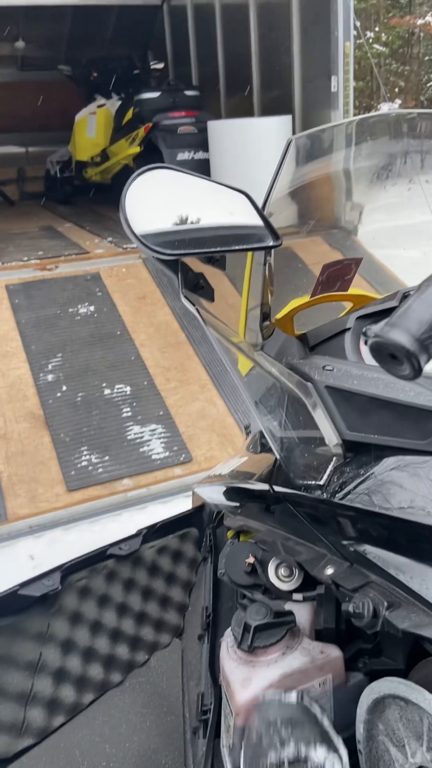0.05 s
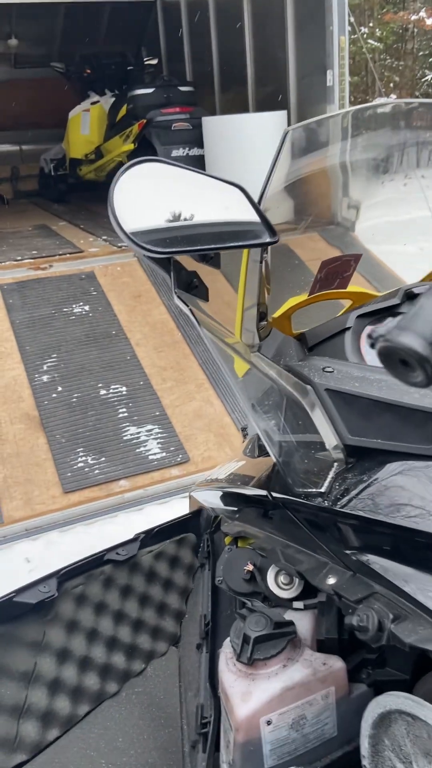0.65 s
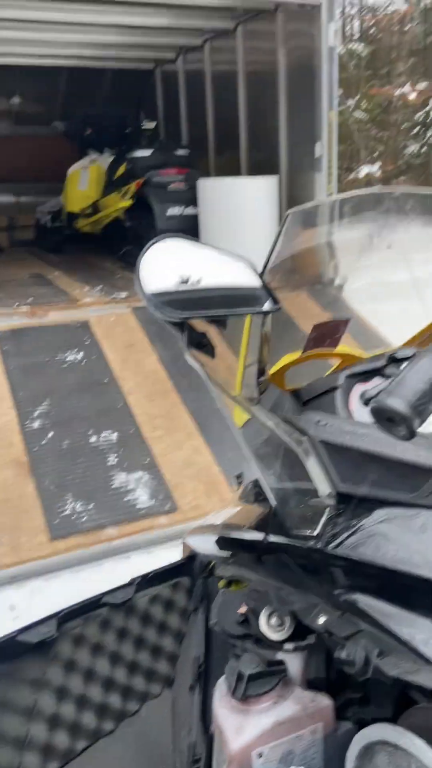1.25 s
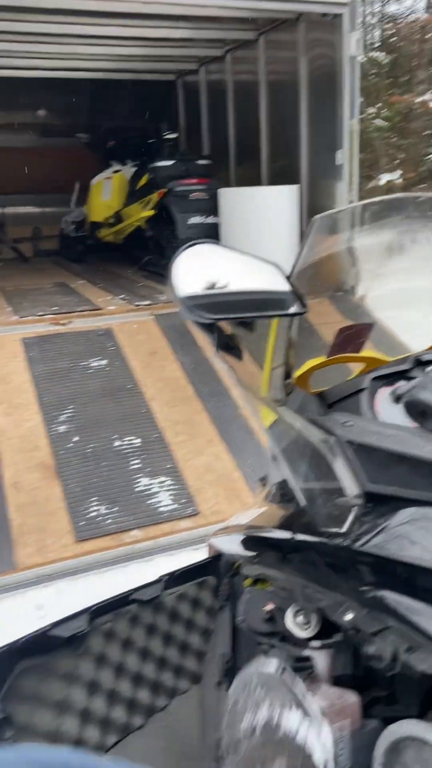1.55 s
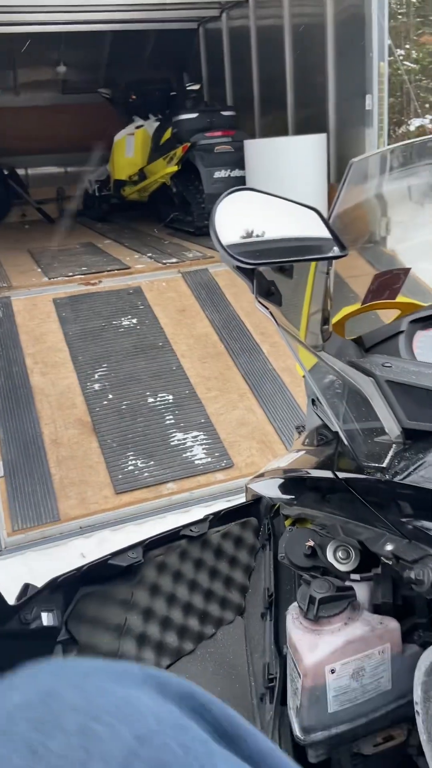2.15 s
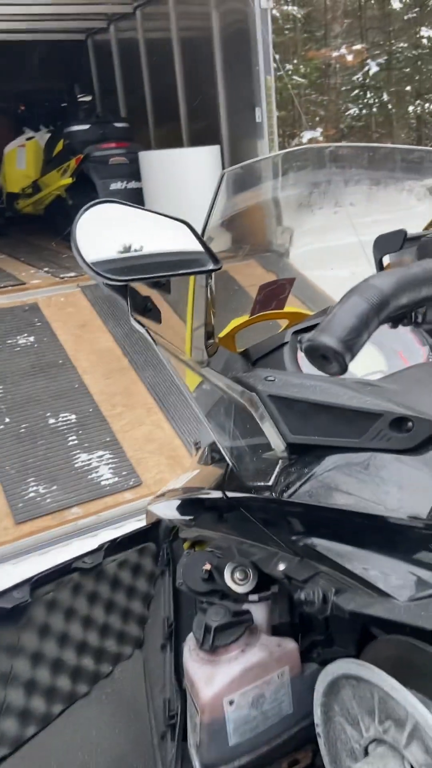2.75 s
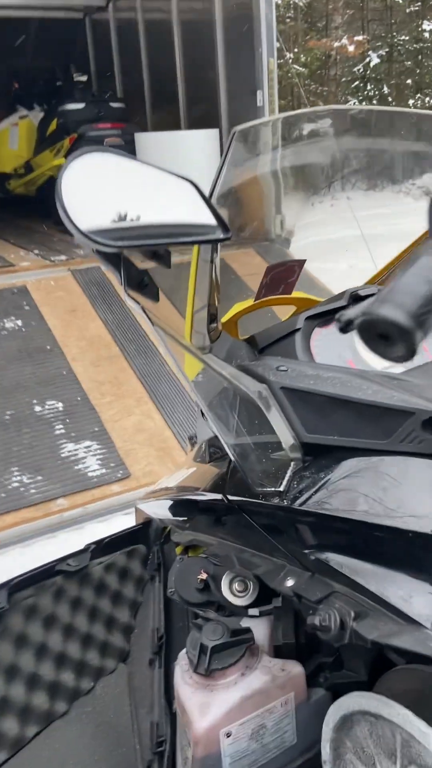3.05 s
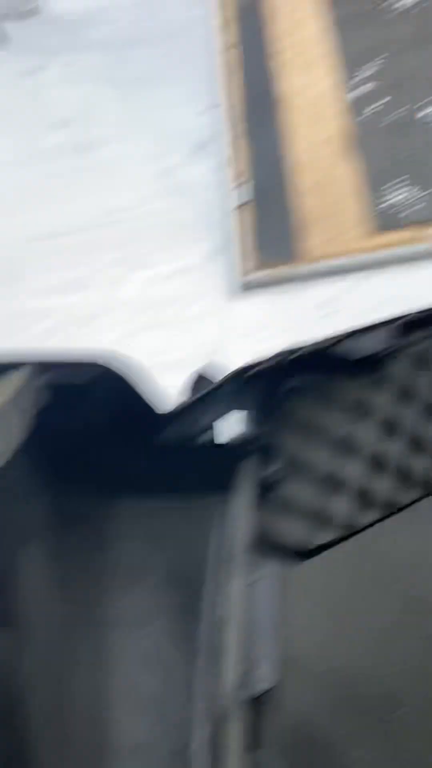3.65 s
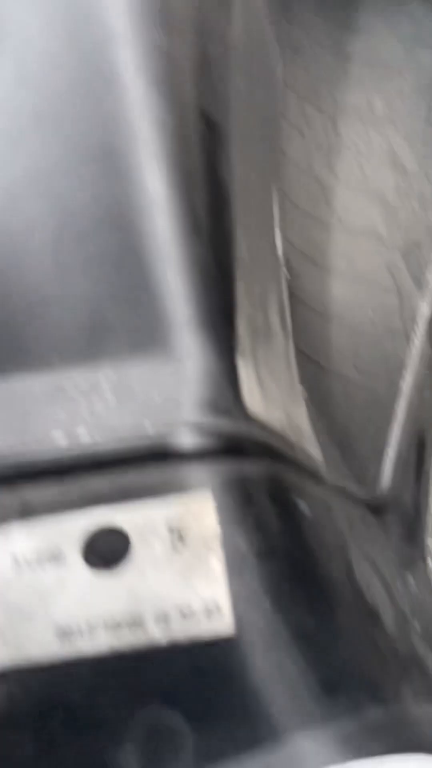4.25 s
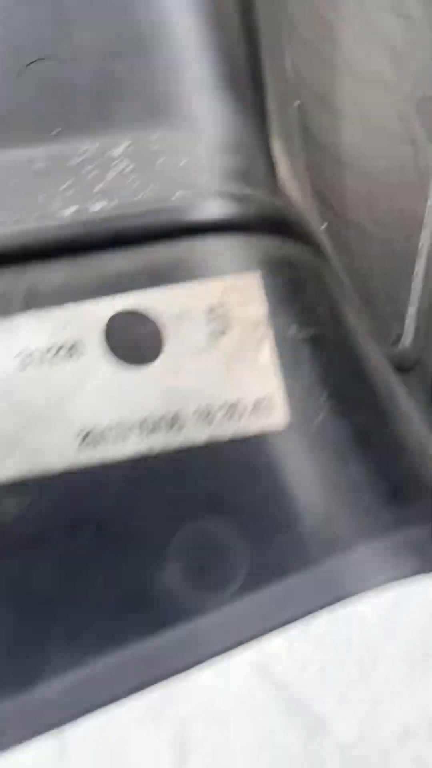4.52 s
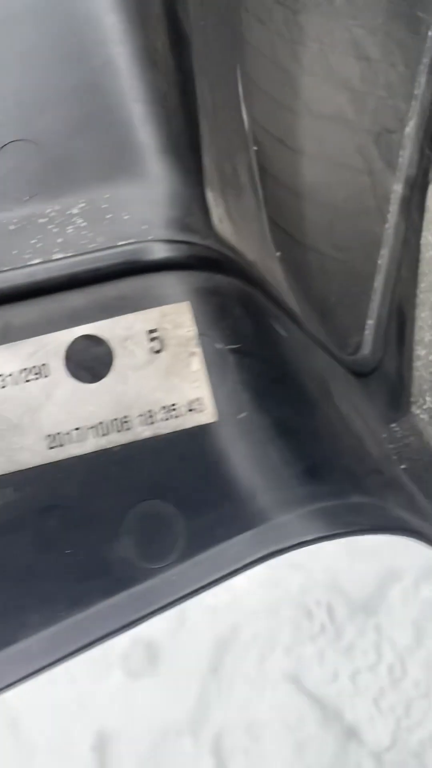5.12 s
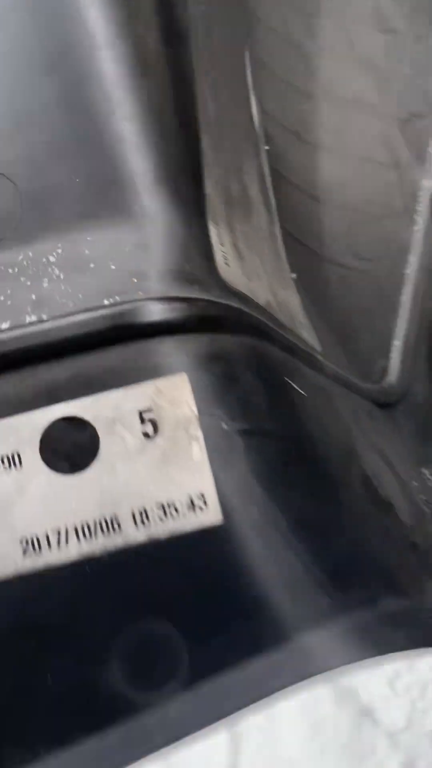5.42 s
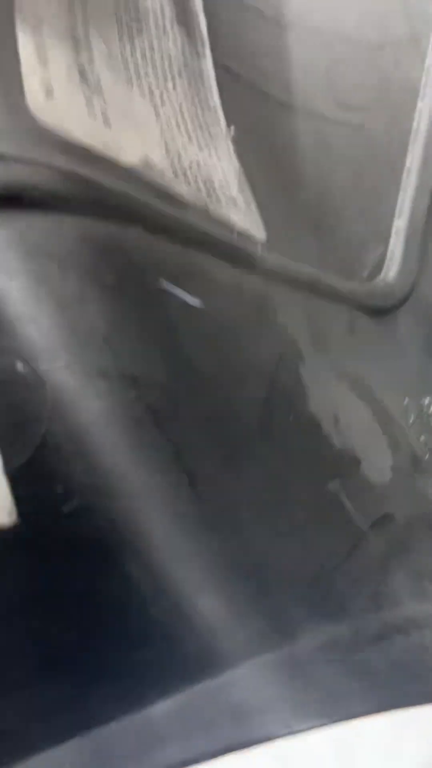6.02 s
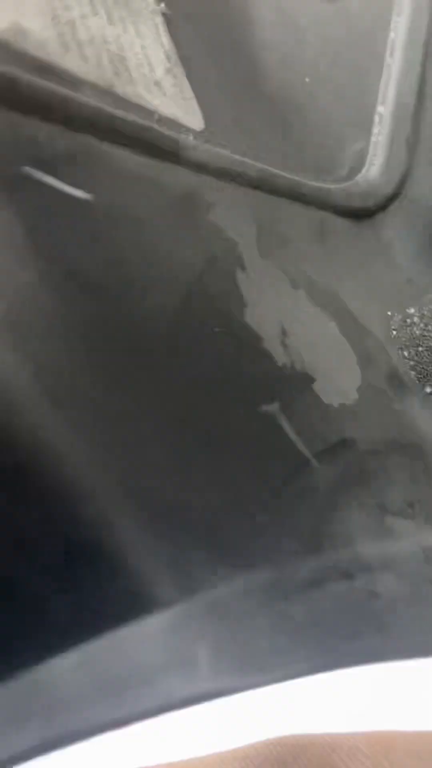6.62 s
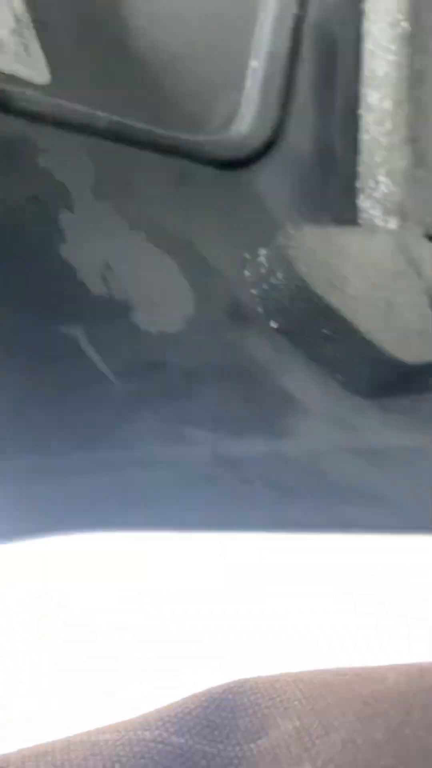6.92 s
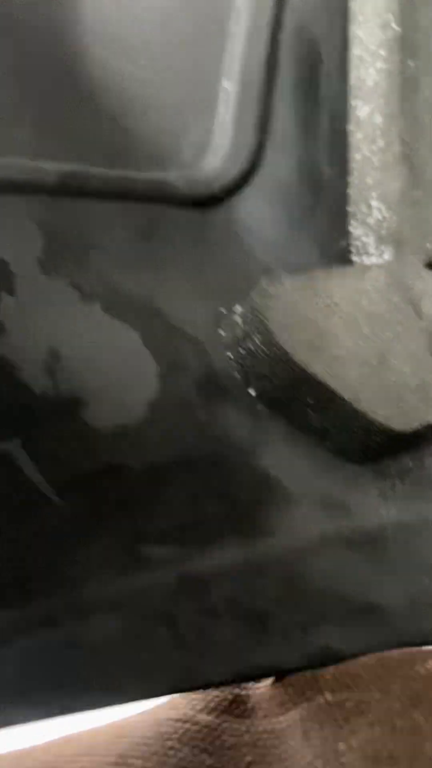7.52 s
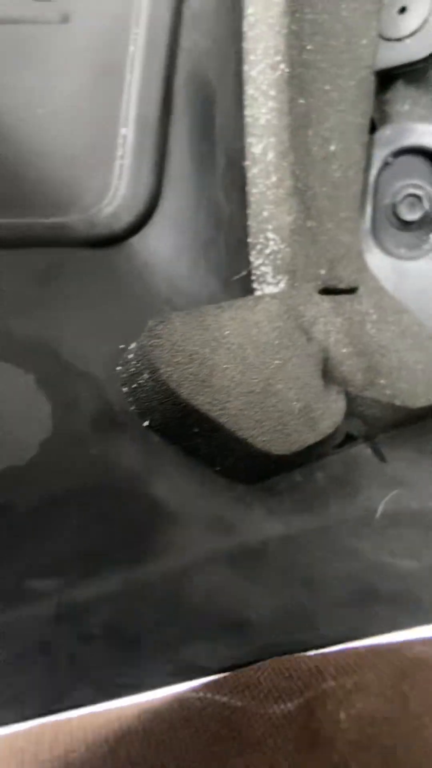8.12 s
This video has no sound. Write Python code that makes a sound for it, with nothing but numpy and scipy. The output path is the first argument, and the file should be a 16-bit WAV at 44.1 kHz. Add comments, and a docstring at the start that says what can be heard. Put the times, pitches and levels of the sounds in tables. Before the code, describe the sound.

A distant machine's low, steady hum runs throughout, swelling slightly later, under close, faint cloth rustle and a few soft finger bumps. At 0.8 seconds a hard part snaps against a snowmobile's plastic bodywork, with a bright crack, a hollow ring and a faint short echo from an open trailer. From 2.4 to 3.2 seconds comes a cluster of lighter clicks and clacks. Air stirs softly at the microphone around 3.5 seconds. From 4 to 4.8 seconds sleeves swish and zip and a glove scrapes the plastic, with a thin squeak, more snaps and a dull bump. Further snaps fall between 5.7 and 7.1 seconds. From 6 to 7.5 seconds fingers thump and rub the microphone's case, the loudest stretch, with gritty crunches and low rumble. A small creak and swish follow near 7.8 seconds, and another bump at 8.2.

```python
"""Shifting about on a parked snowmobile

Someone beside an open trailer holds a camera close to a snowmobile's plastic panels. Hard parts
snap against the bodywork and make it ring. Fingers bump and rub the camera's case, sleeves swish
and a glove scrapes the plastic. Underneath lie softly stirred air and a distant machine's low hum."""
import sys
import numpy as np
from scipy import signal
from scipy.fft import rfft, irfft, next_fast_len
from scipy.io import wavfile
from scipy.ndimage import uniform_filter1d, map_coordinates

SR = 44100
rng = np.random.default_rng(int(sys.argv[2]) if len(sys.argv) > 2 else 0)


def inscribe(sig):
    """Save sig as 16-bit PCM at rate SR to the path in sys.argv[1].

    A 1-D sig is mono; a 2-D sig holds one channel per row.
    Samples are clipped to [-1, 1] before scaling.
    """
    pcm = np.round(np.clip(np.atleast_2d(sig).T, -1, 1) * 32767)
    wavfile.write(sys.argv[1], SR, pcm.astype(np.int16))


N = 364707
COARSE_TIMES_S = np.arange(0, N / SR, .002)  # enough for slow changes in loudness

# soft finger bumps on the camera's case: start_s, level_db, pitch_hz, fade_s, scuff_over_ring_db
FINGER_BUMPS = [(0.167, -20, 308, 0.0066, -11), (0.213, -28, 156, 0.013, -3.5),
                (1.292, -28, 223, 0.0082, -9), (1.352, -25.5, 157, 0.011, -15),
                (1.435, -38.5, 280, 0.007, -4.5), (3.232, -25.5, 151, 0.008, -21),
                (4.653, -10, 152, 0.016, -9), (4.698, -19.5, 144, 0.0072, -9.5),
                (5.391, -22, 175.5, 0.014, -5.5), (6.056, -10, 298, 0.0051, -7),
                (6.08, -6, 311, 0.0095, -14), (6.093, -8.5, 295, 0.0072, -25),
                (6.1366, -2, 297, 0.0075, -12.5), (6.162, -19, 214, 0.023, -8),
                (6.182, -15.5, 125, 0.011, -9.5), (6.333, -18.5, 314, 0.0072, -17),
                (6.582, -13, 126, 0.011, -9.5), (6.64, -11.5, 201.6, 0.018, -3.5),
                (6.892, -5, 138, 0.007, -8.5), (7.016, -3, 146, 0.0086, -11),
                (7.044, -8, 198, 0.0063, -4.5), (7.057, -11, 120, 0.015, -8.5),
                (7.164, -18.5, 105, 0.012, -12), (7.394, -19, 339, 0.0086, -2.5),
                (7.421, -13, 177, 0.012, -8.5), (7.438, -15.5, 193, 0.01, -24),
                (7.481, -16.5, 303, 0.0072, -24), (7.509, -17.5, 323, 0.0084, -33),
                (7.729, -22.5, 262, 0.0098, -11), (7.768, -25, 235, 0.017, -9),
                (7.91, -23.5, 98.4, 0.036, -12.5), (8.238, -12, 301, 0.0075, -13.5),
                (8.25, -16.5, 205, 0.0099, -32)]
# steady shifting about: time_s, cloth_slide_db, grip_db
BODY_MOVEMENT = [(0.0, -62, -60), (0.33, -71, -56), (0.71, -63, -54), (1.04, -69, -55.5),
                 (1.469, -64.5, -49.5), (1.77, -56, -55), (2.16, -64, -55), (2.51, -55.5, -45),
                 (2.67, -59.5, -52.5), (2.85, -54.5, -55), (3.04, -52, -44.5), (3.55, -51.5, -43),
                 (3.88, -60.5, -49.5), (3.98, -49, -50), (4.12, -50, -57), (4.33, -51.5, -43),
                 (4.7, -53, -52), (4.86, -54, -39), (5.0, -56, -52.5), (5.24, -55.5, -49),
                 (5.3, -57.5, -49), (5.4, -54.5, -46), (5.71, -52, -49), (6.36, -56.5, -40.5),
                 (6.76, -51, -45), (6.91, -58.5, -59), (7.02, -59.5, -26.5), (7.16, -56, -49.5),
                 (7.45, -61, -35), (7.58, -56.5, -46), (7.7, -49, -39.5), (8.1, -59.5, -49),
                 (8.27, -56, -48.5)]
# the camera is lowered: time_s, position (0 above the panel, 1 beside it)
CAMERA_POSITION = [(3.97, 0.06), (4.3, 1)]


def snaps():
    """A hard part hits the bodywork: a bright crack and stiff ring, then the panel's clack and boom."""
    # start_s, strength_db, then relative to that: flex_db (panel bending), latch_db, edge_db, sheen_db
    hits = [(0.8055, -27, -1, -7.5, -5.5, -0.5), (2.3768, -41, -6.5, -9, -5, 0.5),
            (2.4295, -39.5, -18, -10, -4, 1), (2.4546, -31, 0, -2.5, -3.5, 4.5),
            (2.555, -34, -1, -4, -2.5, 4.5), (2.7104, -43, -7.5, -3, -1.5, 7.5),
            (2.7304, -49, -6.5, -15, -3, 5), (2.864, -33, -1, -1.5, -3, 3),
            (2.895, -57.5, 9, -13, -14, -12), (2.9548, -40, -3, -4, -6, -0.5), (2.968, -46, 3, -2, -4, -2),
            (2.978, -44, -2, -4, -7, -13), (3.1821, -46.5, -4, -1, -7, 0.5), (3.191, -49, -3, 0, -7, 4),
            (3.9696, -35.5, -1, 1, -4.5, -5.5), (4.215, -49, 8.5, -1, -6, -8),
            (4.2529, -41, -5, 4.5, -1, 5), (4.4629, -36.5, 0.5, 1.5, -3, -5),
            (4.4841, -36, -3, 0.5, -2, -1), (4.7306, -41.5, -1, -5, -4, 1.5), (4.7557, -42, -3, -3, -2, 3),
            (4.787, -36.5, -4, -1, -0.5, 4), (5.041, -49.5, -9, -7, -8, -5),
            (5.7034, -38.5, 0.5, 0.5, -4.5, -2), (5.7213, -36.5, -1.5, 2.5, -3.5, 2.5),
            (5.883, -35.5, -1.5, 1.5, -3.5, 3), (6.301, -37, 1, 1, -3, 4),
            (6.4298, -33, -1.5, -1, -4.5, 2.5), (6.577, -35.5, 6.5, -7, -17, -5),
            (6.5868, -29.5, -1.5, -2.5, -5.5, 1), (6.6078, -48, 17.5, 6, -12, -2),
            (6.8538, -32.5, 0, -4.5, -15, 4), (6.863, -42.5, 2, 2, -8, 3), (6.8782, -42.5, 8, -2, -10, 4),
            (6.9489, -35, -0.5, -10, -12, -0.5), (6.965, -35.5, -1.5, -11, -15, 0),
            (6.979, -42.5, 4, -4, -11, -8), (7.0579, -40.5, 0, -16, -6, 4.5),
            (7.144, -38.5, 4, -10, -17, -14)]
    # tone of the crack and of its glassy top: frequency_hz, level_db
    crack_tone = [(300, -9.5), (1200, 7), (2300, -15), (3200, 7.5), (3800, -1), (4200, 4.5), (4700, -3.5),
                  (5200, 3.5), (6200, -16.5), (8300, -26), (16000, -31.5)]
    sheen_tone = [(5000, -32), (7000, 8.5), (9000, -4), (10100, 1), (11500, 7), (13000, 7.5), (16000, -3)]
    # ringing notes of a latch and of an edge: pitch_hz, level_db, ring_s
    latch_notes = [(3140, -4.5, 0.005), (3694, -3.5, 0.014), (3870, 2, 0.016), (4080, 8, 0.0097),
                   (4220, -6.5, 0.014)]
    edge_notes = [(4650, -4.5, 0.013), (5030, 3, 0.011), (5320, -3.5, 0.011), (6900, -14.5, 0.012),
                  (9290, -12.5, 0.0057), (10720, -16, 0.013), (11430, -22, 0.026)]
    # the hits drift to the right and back: time_s, left_minus_right_db
    direction = [(0.8, 0), (4.75, -0.5), (5.7, -2), (6.43, -2), (6.85, 0)]
    crack_db, chatter_db, chatter_s = -3.5, -16, 0.0045
    out, t = np.zeros((2, N)), np.arange(SR // 7) / SR
    for start, db, flex_db, latch_db, edge_db, sheen_db in hits:
        crack = burst(crack_tone, t, wide=.28)
        sheen = amp(sheen_db) * burst(sheen_tone, t, wide=.4)
        latch = amp(latch_db) * ringing(latch_notes, t, lag_s=.0008)
        edge = amp(edge_db) * ringing(edge_notes, t, lag_s=.0008)
        panel = panel_clack(t, start, flex_db) + panel_boom(t, flex_db)
        pan_db = np.interp(start, *np.transpose(direction)) * np.array([[.5], [-.5]])
        gain = amp(db + pan_db)
        add(out, start, gain * (amp(crack_db) * crack + sheen + latch + edge + panel))
        # the part touches again at once, more softly
        add(out, start + chatter_s * rng.uniform(.5, 1.5), gain * amp(chatter_db) * (crack + sheen))
    return out


def panel_clack(t, start, flex_db):
    """The panel clacks; each spot that is hit favours the notes around one pitch."""
    # the panel's middle notes: pitch_hz, level_db, ring_s
    notes = [(945, 2, 0.031), (1014, 2.5, 0.034), (1211, 3.5, 0.034), (1490, 5.5, 0.02),
             (1660, -4.5, 0.018), (2060, -1.5, 0.026), (2334, 1, 0.02), (2460, -6.5, 0.016),
             (2580, -6, 0.023)]
    # the hits wander over the panel: time_s, favoured_pitch_hz
    spots = [(0.8, 1680), (2.4, 1470), (2.55, 1340), (2.72, 1490), (2.9, 1130), (5.9, 950), (6.3, 1080)]
    # the rough part of the clack: frequency_hz, level_db
    rasp_tone = [(500, -24), (1100, -8.5), (1500, -3.5), (1900, 0), (2400, -2.5), (2900, -14.5),
                 (4500, -13), (7000, -41.5)]
    fall_db_per_octave, rasp_db = 13.5, -7.5
    favoured_hz = np.interp(start, *np.transpose(spots))
    # beside the panel the clack is quieter, shorter and arrives sooner
    beside = np.interp(start, *np.transpose(CAMERA_POSITION))
    clack_db = 7 + 0.31 * flex_db - 7 * beside
    ring_share = np.interp(beside, [0, 1], [1, 0.86])
    lag_s = np.interp(beside, [0, 1], [0.00097, 0.0001])
    favoured = [(hz, db - fall_db_per_octave * abs(np.log2(hz / favoured_hz)), ring_s * ring_share)
                for hz, db, ring_s in notes]
    ring = ringing(favoured, t, lag_s, spread=0.14, scatter_db=2)
    return amp(clack_db) * (ring + amp(rasp_db) * burst(rasp_tone, t, wide=.3))


def panel_boom(t, flex_db):
    """The panel booms hollowly, louder and deeper where it bends more."""
    # the panel's low notes: pitch_hz, level_db, ring_s
    notes = [(153, -6, 0.13), (240, -1.5, 0.1), (364, -2.5, 0.057), (433.6, 8, 0.027), (556, 3, 0.018),
             (664, -12.5, 0.06)]
    tilt_db_per_octave = 2 - 0.062 * flex_db
    tilted = [(hz, db + tilt_db_per_octave * np.log2(hz / 350), ring_s) for hz, db, ring_s in notes]
    return amp(9 + flex_db) * ringing(tilted, t, lag_s=0.00243, spread=0.11, scatter_db=4)


def bumps():
    """A fingertip pushes the camera's case: a dull scuff of skin, a short ring and a low thud."""
    # tone of the scuff: frequency_hz, level_db
    scuff_tone = [(30, -24.5), (70, -5), (150, 7.5), (300, -0.5), (500, -7.5), (800, -17), (1500, -32),
                  (3000, -64), (6000, -61), (16000, -50)]
    press_s, scuff_lead_s, leak_hz = 0.0042, 0.00255, 16
    thud_db, thud_hz = -6.5, 84
    out, t = np.zeros((2, N)), np.arange(SR // 5) / SR
    drag = (1 - np.exp(-t / 0.00049)) * (np.exp(-t / 0.021) + amp(-10.5) * np.exp(-t / 0.025))
    for start, db, hz, fade_s, scuff_db in FINGER_BUMPS:
        press = (1 - np.exp(-(t / press_s) ** 2)) * np.exp(-t / fade_s)
        ring = lambda pitch: press / press.max() * np.sin(2 * np.pi * pitch * t)
        add(out, start - scuff_lead_s, amp(db + scuff_db) * drag * noise(scuff_tone, len(t), wide=0.42))
        add(out, start, amp(db) * (ring(hz) + amp(scuff_db + thud_db) * ring(thud_hz)))
        # the finger settles again: later, weaker, lower
        add(out, start + 0.0254, amp(db - 11.5) * ring(hz * 0.802))
    return filtered(out, lambda hz: (1j * hz / (1j * hz + leak_hz)) ** 2)  # slow pushes leak away


def rubbing_gains():
    """How strong rumble, swish and hiss are: surges add to the shifting, and bumps shake the case."""
    # brief surges of noise: peak_s, length_s, swish_db, hiss_over_swish_db
    # Most are a sleeve or hand moving. The one at 0.824 s is the first knock's fading tail,
    # and the one at 0.967 s is that knock's faint, late, hissy echo.
    noise_surges = [(0.008, 0.045, -53, -8), (0.177, 0.032, -68, 23), (0.26, 0.065, -57.5, -7.5),
                    (0.43, 0.084, -59.5, -14), (0.631, 0.2, -56.5, -6), (0.824, 0.1, -48.5, -12),
                    (0.967, 0.045, -70, -5), (1.19, 0.19, -58.5, -20), (1.298, 0.096, -50.5, -8),
                    (1.64, 0.33, -60, -2), (1.747, 0.028, -55, -23), (1.891, 0.17, -57.5, -7),
                    (2.748, 0.14, -47.5, -12.5), (3.004, 0.076, -48, -16), (3.684, 0.37, -45, -10.5),
                    (3.963, 0.13, -44.5, -13), (4.106, 0.2, -39.5, -9), (4.25, 0.073, -35.5, -9.5),
                    (4.384, 0.067, -42.5, -7.5), (4.547, 0.11, -42.5, -12), (4.628, 0.073, -37, -10),
                    (4.736, 0.11, -41.5, -10.5), (5.465, 0.041, -46.5, -15), (6.141, 0.041, -42, -17),
                    (6.186, 0.067, -47.5, -6), (6.573, 0.078, -38, -11), (6.666, 0.1, -41, -8.5),
                    (6.856, 0.17, -42, -10.5), (6.99, 0.029, -45, -14), (7.05, 0.11, -39, -5.5),
                    (7.157, 0.072, -45, -5), (7.39, 0.23, -45, -7.5), (7.662, 0.058, -53.5, 3),
                    (7.768, 0.12, -41.5, -4), (8.26, 0.057, -43, -4)]
    shudder_db, shudder_s = -21.5, 0.038
    t = COARSE_TIMES_S
    slide_db, grip_db = curves(BODY_MOVEMENT, t)
    peak, length, db, bright_db = columns(noise_surges)
    surges = amp(db) * swells(peak, length)
    hit, hit_db, *_ = columns(FINGER_BUMPS)
    shudders = amp(hit_db + shudder_db) * (t > hit) * np.exp(-np.abs(t - hit) / shudder_s)
    heaviness = amp(3 - 0.39 * bright_db)  # bright surges are light, so they rumble less
    rumble = together(amp(grip_db + 5.5), heaviness * surges, shudders)
    swish = together(amp(slide_db + 2.5), surges)
    fibre_db = -66.5 + 0.7 * (slide_db - slide_db.mean())
    hiss = together(amp(fibre_db), amp(bright_db) * surges)
    return rumble, swish, hiss


def rubbing(rumble, swish, hiss):
    """Cloth slides in uneven catches; the case passes on the low part as a rumble."""
    # tone of each part: frequency_hz, level_db
    rumble_tone = [(30, -39.5), (70, 5.5), (120, 0), (200, -1.5), (320, -5), (500, -15), (900, -27.5),
                   (2000, -47), (5000, -100)]
    swish_tone = [(150, -43.5), (400, 7), (700, 1), (1100, -2.5), (1600, -2.5), (2300, -8.5), (3200, -15.5),
                  (5000, -23), (9000, -35)]
    hiss_tone = [(1200, -23.5), (2800, -6), (4200, -4.5), (5600, 0), (7000, 2), (9000, -4.5), (11500, 2.5),
                 (13000, 0), (16000, -6.5)]
    catches, fibres = wobble(55), wobble(600)
    case = unit(noise(rumble_tone, N) * amp(1.47 * wobble(22) + catches))
    folds = moving_folds(noise(swish_tone, N), depth_db=3.4)
    folds = unit(folds * amp(1.8 * catches + 2.6 * fibres))
    weave = moving_folds(noise(hiss_tone, N), depth_db=2.8)
    weave = unit(weave * amp(0.9 * catches + 0.72 * fibres))
    return rumble * case + swish * folds + hiss * weave


def moving_folds(x, depth_db):
    """The tone shifts from moment to moment as the folds of cloth move."""
    spectrum = signal.stft(x, nperseg=1024)[2]
    patches = uniform_filter1d(rng.standard_normal(spectrum.shape[1:]), size=5, axis=0)
    patches = uniform_filter1d(patches, size=7, axis=1)
    return signal.istft(spectrum * amp(depth_db * unit(patches)), nperseg=1024)[1][:, :N]


def crunches():
    """A hand drags hard over plastic: the skin slips so often that its crackles merge into a crunch."""
    # hard drags: peak_s, length_s, level_db
    drags = [(6.051, 0.03, -46.5), (6.144, 0.04, -47), (6.548, 0.034, -50), (6.606, 0.046, -32.5),
             (6.651, 0.022, -42.5), (6.874, 0.035, -35.5), (6.998, 0.052, -34), (7.053, 0.038, -36.5),
             (7.382, 0.048, -54), (7.495, 0.011, -43), (7.77, 0.032, -48)]
    # tone of the crunch: frequency_hz, level_db
    tone = [(200, -5.5), (500, 14), (1100, 9), (2000, -7), (3000, -4), (4500, -9.5), (6000, -7),
            (9000, -20), (16000, -17.5)]
    slips_per_s, rise_s = 1100, .0004
    slips = (rng.random(N) < slips_per_s / SR) * rng.random(N)
    t = np.arange(SR // 50) / SR
    bursts = signal.fftconvolve(slips, t * np.exp(-t / rise_s))[:N]
    peak, length, db = columns(drags)
    return together(amp(db) * swells(peak, length)) * unit(bursts * noise(tone, N, wide=0.67))


def grit(rumble):
    """Under a firm grip the skin sticks and slips in tiny crackles."""
    # tone of one slip: frequency_hz, level_db
    tone = [(300, 6.5), (700, 17), (1100, 14.5), (2200, -10), (4000, -10), (7000, -20), (16000, -7)]
    grit_db, slips_per_s, sticks_above_db, range_db = -16, 420, -44.5, 8.5
    firmness = np.clip((20 * np.log10(rumble) - sticks_above_db) / range_db, 0, 1)
    slips = (rng.random(N) < slips_per_s / SR) * amp(2.3 * np.minimum(rng.exponential(size=N), 3))
    t = np.arange(SR // 100) / SR
    slip = noise(tone, len(t)) * np.exp(-t / 0.0029)
    slips *= rng.choice([-1, 1], N)
    crackle = signal.fftconvolve(slips[None], slip, axes=1)[:, :N]
    return amp(grit_db) * rumble * firmness * unit(crackle)


def creak():
    """A fingertip creaks over the camera's case; each slip is a dry tick."""
    # slips: start_s, level_db
    slips = [(6.603, -44), (6.6225, -48), (6.9875, -51), (6.9965, -45), (7.003, -50), (7.0386, -46),
             (7.7702, -36), (7.777, -42), (7.7873, -34), (7.7985, -41)]
    # the case's notes: pitch_hz, level_db, ring_s
    notes = [(1054, 5, 0.0056), (2120, -4, 0.0089), (5830, -4, 0.0062), (6770, 2, 0.0073),
             (8900, 0, 0.0031), (10800, -5, 0.0032)]
    out, t = np.zeros((2, N)), np.arange(SR // 50) / SR
    for start, db in slips:
        add(out, start, amp(db) * ringing(notes, t, lag_s=0))
    return out


def scrapes():
    """Grainy hiss, mostly the grain of the plastic flicking past a glove and ringing the panel."""
    # surges of grainy hiss: peak_s, length_s, level_db
    # The one at 0.969 s is the first knock's faint, late, hissy echo.
    surges = [(0.64, 0.18, -63), (0.969, 0.05, -65.5), (4.104, 0.11, -46), (4.194, 0.034, -53),
              (4.243, 0.071, -41), (4.387, 0.05, -46), (4.552, 0.1, -49), (4.633, 0.033, -41.5)]
    # where the panel rings: pitch_hz, width_hz, level_db
    resonances = [(1400, 130, 2), (1850, 120, 1), (2430, 220, 1), (4200, 550, -4), (5160, 520, 1),
                  (5920, 990, -3.5)]
    grains_per_s, uneven_db = 2000, 2.5
    shared, apart = (rng.random((2, N)) < grains_per_s / SR) * rng.standard_normal((2, N))
    panel = lambda f: sum(amp(db) * 1j * f * width / (hz * hz - f * f + 1j * f * width) * (-1) ** k
                          for k, (hz, width, db) in enumerate(resonances))
    grains = filtered(shared + 0.5 * np.array([apart, -apart]), panel)
    peak, length, db = columns(surges)
    return together(amp(db) * swells(peak, length)) * unit(grains * amp(uneven_db * wobble(90)))


def zips_and_clack():
    """Noise with a rough pitch: ribbed fabric zipping over an edge, and also one short, dry clack."""
    # middle_s, level_db, half_length_s, pitch_hz; the row at 4.582 s is the clack, near 2.2 kHz
    sounds = [(0.193, -49, 0.066, 2000), (1.394, -54.5, 0.073, 2430), (1.879, -53, .09, 2250),
              (2.806, -41, 0.024, 1730), (4.173, -39, 0.077, 2200), (4.404, -43.5, 0.029, 1600),
              (4.57, -40, 0.041, 1670), (4.582, -27.5, 0.0037, 2240), (4.641, -32.5, 0.019, 1900),
              (6.067, -44, 0.043, 2540), (7.791, -45.5, 0.047, 2000)]
    out = np.zeros((2, N))
    for middle, db, half, hz in sounds:
        t = np.arange(-half, half, 1 / SR)
        band = noise([(hz / 2, -26), (hz / 2.1, -6), (hz, 0), (hz * 1.16, -8), (hz * 2, -26)], len(t))
        add(out, middle - half, amp(db) * np.hanning(len(t)) * band)
    return out


def squeaks():
    """Thin, brief squeaks with a slightly unsteady pitch."""
    # middle_s, level_db, half_length_s, pitch_hz
    chirps = [(1.402, -56, 0.038, 2580), (4.173, -43, 0.035, 2370), (6.247, -59, 0.037, 4780),
              (8.198, -60.5, 0.057, 2480)]
    out = np.zeros((2, N))
    for middle, db, half, hz in chirps:
        t = np.arange(-half, half, 1 / SR)
        pitch = hz * (1 + 0.022 * wobble(300)[:len(t)])
        tone = np.sin(2 * np.pi * np.cumsum(pitch) / SR)
        add(out, middle - half, amp(db) * np.hanning(len(t)) * tone)
    return out


def trailer_echo(x):
    """The open trailer gives back a faint short echo, weaker when the camera is beside the panel."""
    # how long the echo lasts: frequency_hz, ring_s
    ring_times = [(150, 0.3), (1000, 0.12), (2300, 0.2), (4500, 0.3), (7000, 0.11), (12000, 0.05)]
    beside, = curves(CAMERA_POSITION)
    sent = x * amp(-20.5 - 10 * beside)
    t = np.arange(SR // 3) / SR
    tail = dying(rng.standard_normal((2, len(t))), ring_times, window=256)
    tail *= 1 - np.exp(-t / 0.0031)
    return signal.fftconvolve(sent, tail / np.linalg.norm(tail[0]), axes=1)[:, :N]


def stirred_air():
    """Quick swings and an unsteady hand stir the air at the camera's microphone."""
    # swings of the camera: peak_s, level_db
    swings = [(0.18, -37), (1.67, -36), (3.1, -49), (3.48, -29.5), (4.13, -29.5), (4.721, -29), (6.92, -41),
              (7.05, -18), (7.46, -29), (8.18, -38.5)]
    # deep tone of the air: frequency_hz, level_db
    tone = [(10, -28), (25, -27.5), (42, 4.5), (60, 2.5), (100, 5.5), (250, -62), (1000, -120)]
    peak, db = columns(swings)
    gusts = together(amp(db) * swells(peak, length_s=0.057))
    _, grip_db = curves(BODY_MOVEMENT)
    tremor = amp(grip_db + 0.5)
    return np.hypot(gusts, tremor) * noise(tone, N)


def hum():
    """A machine runs some way off; only its lowest tone carries."""
    # time_s, level_db
    loudness = [(0, -44), (1.5, -42.5), (2.5, -46), (4, -44.5), (5.5, -40), (8.27, -38.5)]
    pitch_hz = 70.45
    phase = 2 * np.pi * pitch_hz * np.arange(N) / SR + .08 * wobble(3)
    drift_db = .5 * wobble(3)
    return amp(curves(loudness)[0] + drift_db) * unit(np.sin(phase))


def ringing(notes, t, lag_s, spread=.2, scatter_db=1.5):
    """Struck plastic rings: low notes arrive later (lag_s at 1 kHz), left and right out of step."""
    contact_s = 0.0002
    hz, db, ring_s = columns(notes)
    scatter, detune, skew = rng.standard_normal((3, len(notes), 1))
    age = np.maximum(t - lag_s * np.sqrt(1000 / hz), 0)
    rise = 1 - np.exp(-age / (contact_s + .5 / hz))
    envelope = amp(db + scatter_db * scatter - 60 * age / ring_s) * rise
    phase = 2 * np.pi * hz * (1 + 0.012 * detune) * age
    sides = [(envelope * np.sin(phase + side * spread * skew)).sum(0) for side in (-1, 1)]
    return unit_hit(np.array(sides))


def burst(tone, t, wide):
    """The noise of a hard hit: it rises at once, and its treble dies sooner than its bass."""
    # frequency_hz, ring_s
    ring_times = [(500, 0.13), (2000, 0.037), (5000, 0.032), (10000, 0.015), (16000, 0.021)]
    rise = 1 - np.exp(-t / 0.00057)
    return unit_hit(rise * dying(noise(tone, len(t), wide), ring_times, window=64))


def noise(tone, size, wide=1):
    """Stereo noise at level 1: nearly mono in the bass, wider higher up."""
    # how alike left and right are when wide is 1: frequency_hz, likeness (0 to 1)
    likeness = [(100, 0.97), (200, 0.3), (400, 0), (800, 0.055), (1600, 0.33), (3000, 0), (6000, 0.68),
                (12000, 0.15)]
    angle = lambda hz: wide * np.arccos(np.clip(along(likeness, hz), -1, 1)) / 2
    shape = lambda hz: amp(along(tone, hz)) * [np.cos(angle(hz)), np.sin(angle(hz))]
    mid, side = filtered(rng.standard_normal((2, size)), shape)
    return unit(np.array([mid + side, mid - side]))


def dying(x, ring_times, window):
    """Fade each frequency by 60 dB over its own ring time."""
    hz, t, spectrum = signal.stft(x, SR, nperseg=window)
    fade = amp(-60 * t / along(ring_times, hz)[:, None])
    return signal.istft(spectrum * fade, SR, nperseg=window)[1][..., :x.shape[-1]]


def filtered(x, response):
    """Scale each frequency of x by response(hz)."""
    n = x.shape[-1]
    padded = next_fast_len(n + 8192)
    return irfft(rfft(x, padded) * response(np.fft.rfftfreq(padded, 1 / SR)), padded)[..., :n]


def swells(peak_s, length_s):
    """One curve per event: it rises to a peak and falls again."""
    rise_share, roundness = 0.44, 2.2
    offset = (COARSE_TIMES_S - peak_s) / length_s
    return np.exp(-np.maximum(-offset / rise_share, offset / (1 - rise_share)) ** roundness)


def together(*gains):
    """Add coarse gain curves by power; gives one value per sample."""
    return np.interp(np.arange(N) / SR, COARSE_TIMES_S, np.linalg.norm(np.vstack(gains), axis=0))


def wobble(rate):
    """A smooth curve through `rate` random values a second."""
    return map_coordinates(rng.standard_normal(int(N * rate / SR) + 4), [np.arange(N) * rate / SR])


def curves(rows, t=np.arange(N) / SR):
    """Turn each column after the time into a curve over t."""
    times, *values = np.transpose(rows)
    return [np.interp(t, times, column) for column in values]


def columns(rows):
    """Split a table into upright columns, ready to combine with a row of times."""
    return np.transpose(rows)[:, :, None]


def along(points, hz):
    """Read between (frequency_hz, value) points on a log scale."""
    frequencies, values = np.transpose(points)
    return np.interp(np.log(hz + 1), np.log(frequencies + 1), values)


def amp(db):
    """Decibels to gain."""
    return 10 ** (np.asarray(db) / 20)


def unit(x):
    """Scale to an average (rms) level of 1."""
    return x / np.sqrt(np.mean(x ** 2) + 1e-20)


def unit_hit(x):
    """Scale so the loudest hundredth of a second has level 1."""
    power = uniform_filter1d(np.mean(x ** 2, axis=0), SR // 100, mode="constant")
    return x / np.sqrt(power.max())


def add(track, start_s, sound):
    """Mix a sound into the track."""
    i = max(round(start_s * SR), 0)
    track[:, i:i + sound.shape[-1]] += sound[..., :max(N - i, 0)]


def scene():
    """Snaps, handling and rubbing close by, over the hum."""
    hits = snaps()
    echo = trailer_echo(hits)
    rumble, swish, hiss = rubbing_gains()
    handling = bumps() + grit(rumble) + creak() + crunches() + stirred_air()
    rustle = rubbing(rumble, swish, hiss) + scrapes() + zips_and_clack()
    return hits + echo + handling + rustle + squeaks() + hum()


def record(dry):
    """The two microphone openings cancel some treble and widen the sound; the very top is cut off."""
    # dips in left plus right, and in left minus right: centre_hz, width_hz, depth_db
    mid_dips = [(7332, 840, 24.5), (13600, 2150, 19)]
    side_dips = [(10660, 1180, 20), (4310, 700, 2)]
    # stereo width: frequency_hz, side_gain_db
    widening = [(200, -15), (450, -4), (800, 5), (1300, 7), (2400, 2), (5000, 7), (8000, 7), (15000, -4)]
    top_hz = 15850
    dips = lambda table, hz: sum(db * np.exp(-((hz - centre) / width) ** 2) for centre, width, db in table)
    mid = filtered((dry[0] + dry[1]) / 2, lambda hz: amp(-dips(mid_dips, hz)))
    side = filtered((dry[0] - dry[1]) / 2, lambda hz: amp(along(widening, hz) - dips(side_dips, hz)))
    return filtered(np.array([mid + side, mid - side]), lambda hz: 1 / np.sqrt(1 + (hz / top_hz) ** 240))


dry = scene()
out = record(dry)
inscribe(out)
```